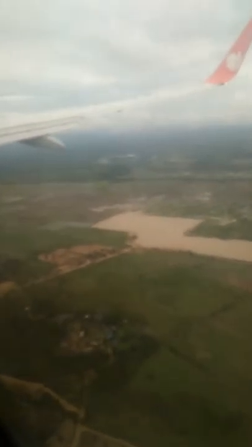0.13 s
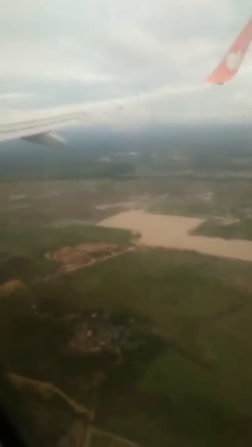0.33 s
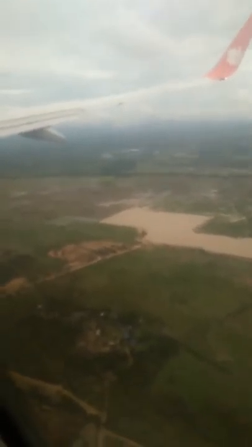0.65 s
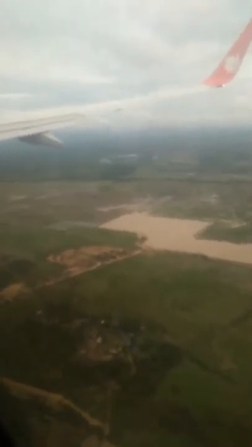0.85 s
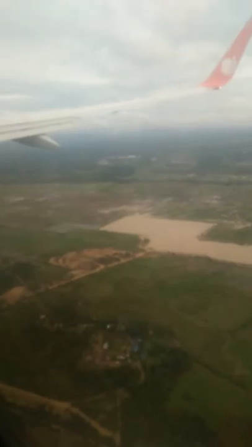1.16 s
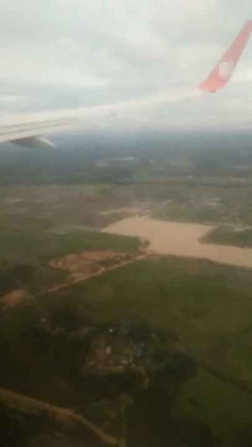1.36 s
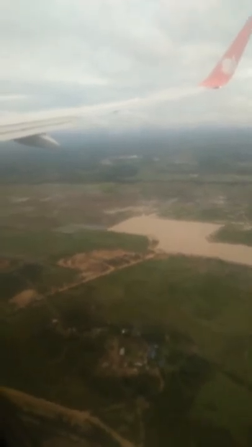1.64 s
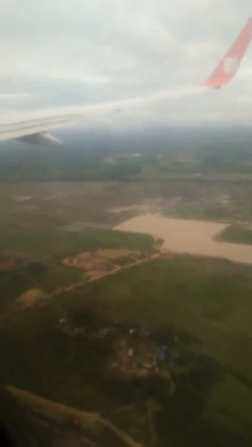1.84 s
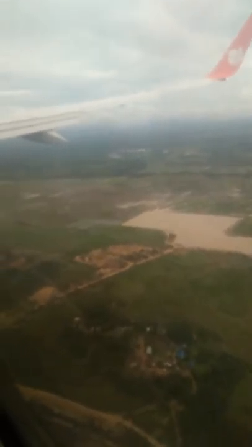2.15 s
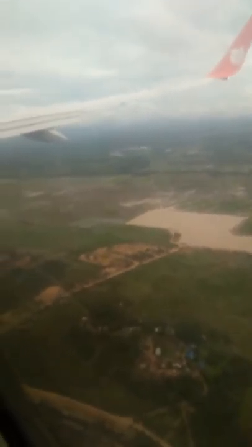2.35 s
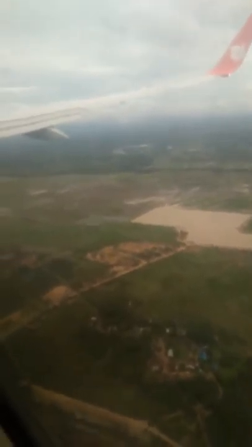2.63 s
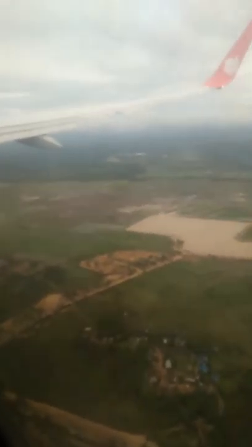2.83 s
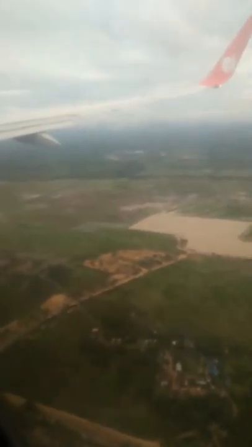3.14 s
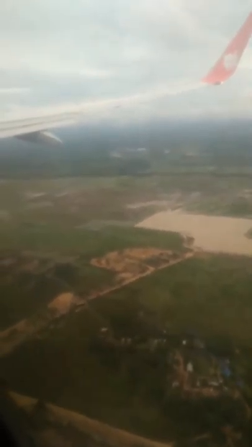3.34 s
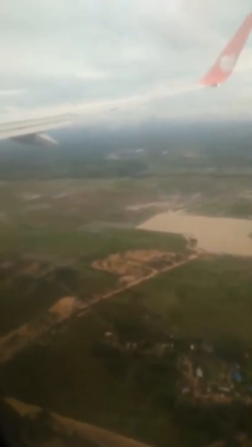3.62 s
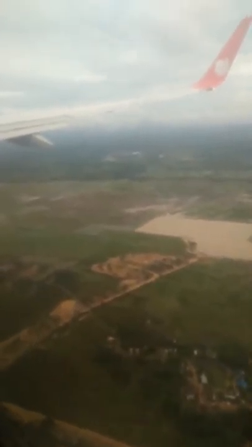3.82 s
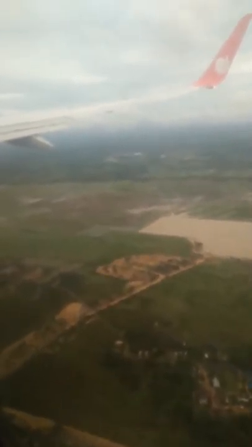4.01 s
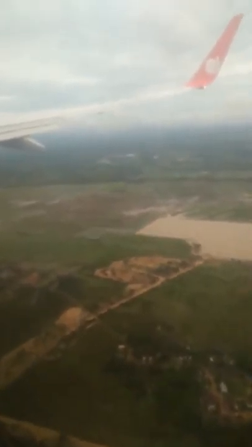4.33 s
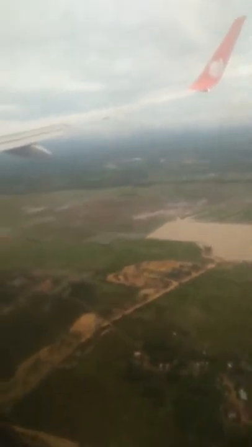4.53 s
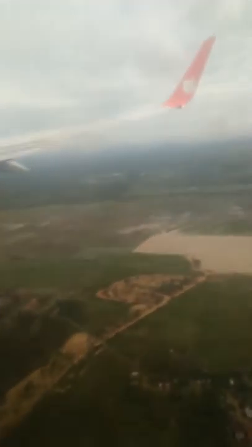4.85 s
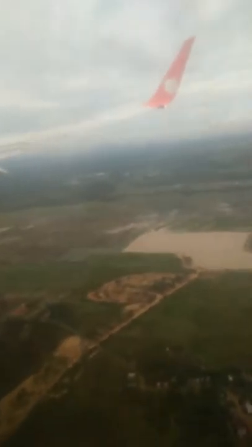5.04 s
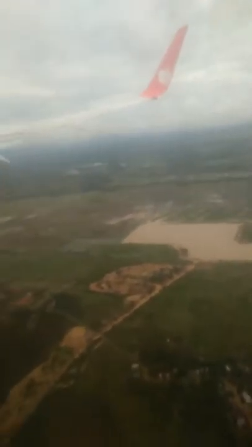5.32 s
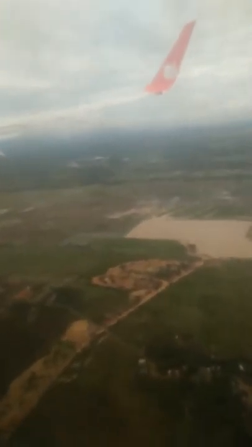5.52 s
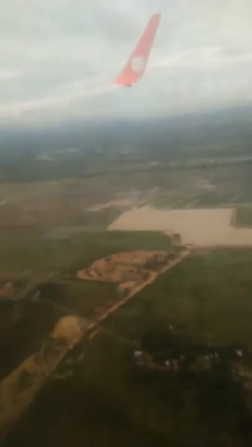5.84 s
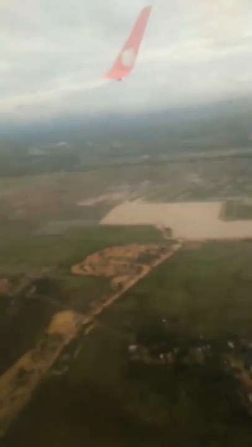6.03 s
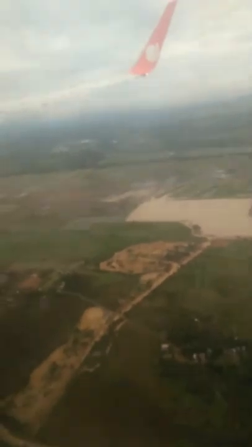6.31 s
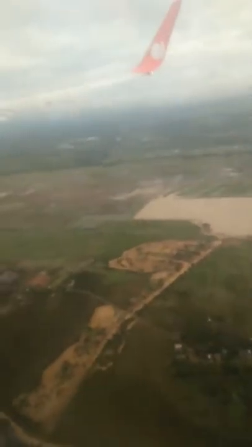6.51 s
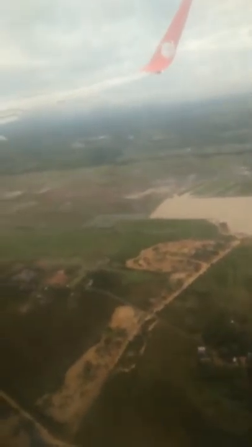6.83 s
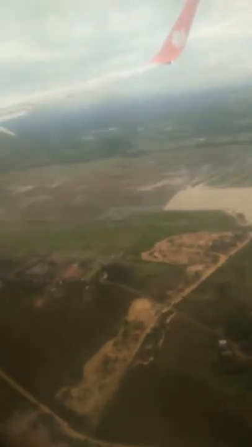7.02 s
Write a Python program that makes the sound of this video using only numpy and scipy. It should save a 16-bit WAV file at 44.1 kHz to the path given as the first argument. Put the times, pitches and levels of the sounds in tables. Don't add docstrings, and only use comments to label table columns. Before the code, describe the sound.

Continuous low cabin roar, bass-heavy and uneven, dominates from start to end, its boom swelling and dipping quickly. Quiet vent hiss and diffuse air noise sit above, with a thin constant-pitched whine that wavers in strength. A few soft, blurred thuds arrive mid-way, and light sleeve brushes and short fabric slips occur close to the phone, the last cluster near the end. Nobody speaks.

```python
import sys
import numpy as np
from scipy import signal
from scipy.fft import rfft, irfft, next_fast_len
from scipy.io import wavfile
from scipy.ndimage import uniform_filter1d, minimum_filter1d, map_coordinates

SR = 44100
rng = np.random.default_rng(int(sys.argv[2]) if len(sys.argv) > 2 else 0)


def bounce(signal):
    frames = np.transpose(np.atleast_2d(signal))
    limited = np.clip(frames, -1, 1)
    pcm = np.round(limited * 32767).astype(np.int16)
    wavfile.write(sys.argv[1], SR, pcm)


def makeup_ratio(level_db):
    decades = np.asarray(level_db, float) / 20
    return 10 ** decades


N = 316197


def unit(x):
    return x / np.sqrt(np.mean(x ** 2) + 1e-20)


def curves(rows):
    times, *columns = np.transpose(rows)
    return [np.interp(np.arange(N) / SR, times, column) for column in columns]


def wobble(rate):
    knots = rng.standard_normal(int(N * rate / SR) + 4)
    return map_coordinates(knots, [np.arange(N) * rate / SR])


def flutter(rate, db):
    return makeup_ratio(db * wobble(rate))


def swells(rows, half_s):
    times, *columns = np.transpose(rows)
    t = np.arange(0, N + 64, 64) / SR
    shape = np.exp(-0.5 * ((t[:, None] - times) / half_s) ** 2)
    return [np.interp(np.arange(N) / SR, t, shape @ db) for db in columns]


def filtered(x, response):
    m = next_fast_len(len(x) + 8192)
    return irfft(rfft(x, m) * response(np.fft.rfftfreq(m, 1 / SR)), m)[:len(x)]


def coloured(spectrum):
    hz, db = np.transpose(spectrum)
    return lambda f: makeup_ratio(np.interp(np.log(f + 1), np.log(hz + 1), db))


def ring(hz, width):
    return lambda f: (f * width / np.abs(hz * hz - f * f + 1j * f * width)) ** 2


def rush(response, patchy_db, wide_hz, long_s):
    z = signal.stft(rng.standard_normal(N), nperseg=512)[2]
    field = rng.standard_normal(z.shape)
    for _ in range(2):
        field = uniform_filter1d(field, size=1 + round(wide_hz * 512 / SR), axis=0)
        field = uniform_filter1d(field, size=1 + round(long_s * SR / 256), axis=1)
    patchy = signal.istft(z * makeup_ratio(patchy_db * unit(field)), nperseg=512)[1][:N]
    return unit(filtered(patchy, response))


def evened(x, seconds):
    size = round(seconds * SR)
    power = uniform_filter1d(uniform_filter1d(x * x, size), size)
    return unit(x / np.sqrt(np.abs(power) + 0.13))


def bursts(rows, rise, grain_db=0):
    out = np.zeros(N + SR)
    t = np.arange(SR // 4) / SR
    for s, db, response, t60 in rows:
        grain = np.interp(t, np.linspace(0, t[-1], num=60), rng.standard_normal(size=60))
        puff = unit(filtered(rng.standard_normal(len(t)), response)) * makeup_ratio(grain_db * grain)
        onset = 1 - np.exp(-t / rise)
        fade = 1 - t / t[-1]
        out[round(s * SR):][:len(t)] += makeup_ratio(db - 60 * t / t60) * fade * onset * puff
    return out[:N]


def frame():
    # (frequency [Hz], level [dB])
    boom = [(15, -41), (30, -14.5), (42, -7.5), (51, 1.5), (64, -5.5), (74, -6), (98, -9.5), (120, -11.5),
            (140, -19.5), (200, -69.5), (300, -120)]
    # (time [s], level [dB])
    surges = [(0.0, -8.5), (0.62, -11.5), (1.59, 5), (1.94, 4.5), (3.56, -9), (3.99, -6), (4.34, 5),
              (4.64, 7.5), (4.98, 3), (5.15, 2.5), (5.4, 5), (5.71, -3.5), (5.82, 6), (6.02, -7),
              (6.19, -12), (6.69, 6), (6.84, -7), (7.08, -7.5)]
    surge_db, = swells(surges, half_s=0.029)
    noise = evened(rush(coloured(boom), 0.48, 0, 0.04), 0.09)
    return makeup_ratio(surge_db - 30) * flutter(rate=9.8, db=1.38) * noise


def wall():
    # (frequency [Hz], level [dB])
    panel_modes = [(70, -59), (105, -19.5), (125, -12.5), (138, -4.5), (148, 1), (168, -2), (186, 1),
                   (207, -2), (238, -17.5), (280, -48), (450, -120)]
    # (frequency [Hz], level [dB])
    trim_modes = [(140, -37.5), (240, -7), (269, 4), (292, 4), (316, 0.5), (368, -22), (480, -45.5),
                  (810, -120)]
    # (time [s], level on the panel [dB], level on the trim [dB])
    gusts = [(0.09, -9, -9), (0.59, -12, -10.5), (0.68, 1.5, -4), (1.0, -5.0, -9), (1.21, -3, -4),
             (2.37, -2.0, -7.5), (2.57, 0, 6.5), (2.7, 5, 3), (2.81, 2.5, -4.5), (3.0, -6.5, -3.5),
             (3.26, 2.0, 5), (3.35, 4, -7), (3.46, 8.5, 4.5), (3.68, 4.5, -5.5), (4.0, 5.5, 2.0),
             (4.31, -4.5, -4), (4.54, 6.5, 3.5), (4.64, -1, -6), (5.22, -8, -3), (5.4, -9.5, 1.5),
             (5.87, 2, 6), (5.98, 3.5, 11.5), (6.26, 5.0, 6.5), (6.37, -4.5, -3.5), (6.62, 4, 6.5),
             (6.81, 3, 4.5), (7.0, -2.5, 2.0), (7.16, -8, 2)]
    # (time [s], level [dB])
    jolts = [(.265, 10), (.70, 4), (1.10, 4), (1.355, 7.5), (1.52, 6.5), (1.62, 3), (1.80, 0), (1.94, 0),
             (2.15, 3), (2.265, 7), (2.48, 7), (2.92, -1), (3.13, 7.5), (3.64, 0), (4.43, 7), (4.97, 4.5),
             (5.17, 9), (5.33, 9.5), (5.81, 2.5), (6.67, 1.5), (6.795, 2.5)]
    panel_db, trim_db = swells(gusts, half_s=0.036)
    jolt_db, = swells(jolts, half_s=0.015)
    panel_noise = evened(rush(coloured(panel_modes), 0.9, 0, 0.03), 0.065)
    trim_noise = evened(rush(coloured(trim_modes), 0.7, 0, 0.04), 0.064)
    panel = makeup_ratio(panel_db + jolt_db - 32) * flutter(rate=20, db=2.04) * panel_noise
    trim = makeup_ratio(trim_db + 0.7 * jolt_db - 40) * flutter(rate=20, db=2.04) * trim_noise
    return panel + trim


def window():
    # (frequency [Hz], level [dB])
    pane_modes = [(220, -34.5), (374, -4.5), (393, 0.5), (409, -1), (476, -0.5), (517, -11.5), (591, -2.5),
                  (655, -13), (850, -42), (1440, -120)]
    # (frequency [Hz], level [dB])
    gap_modes = [(390, -35), (660, -10.5), (725, 0.5), (895, -2), (1140, -11.5), (1250, -19), (1620, -37),
                 (2750, -120)]
    # (time [s], level on the pane [dB], level in the gap [dB])
    eddies = [(0.09, -3.5, -5), (0.33, -3.5, -5), (0.59, 2.5, 1), (1.16, 1.5, 1.5), (1.51, -2, 3.0),
              (1.76, -3.5, -3.5), (2.29, -1.5, -3.5), (2.54, -5.5, -3.5), (2.68, 1.5, -2.5),
              (2.84, -4, 2.0), (3.08, -6.5, -3), (3.36, -5, -3.5), (3.89, -4.5, 3.5), (4.19, -6.5, 3),
              (5.01, -4.5, 1.5), (5.14, 4.0, 1.5), (5.63, 4.5, -1), (6.06, 5, 1.0), (6.19, 2.5, -4),
              (6.72, 3, 2.5)]
    pane_db, gap_db = swells(eddies, half_s=0.052)
    pane_noise = evened(rush(coloured(pane_modes), 2.0, 0, 0.04), 0.091)
    gap_noise = evened(rush(coloured(gap_modes), 3.6, 0, 0.05), 0.12)
    pane = makeup_ratio(pane_db - 46) * flutter(rate=25, db=1.68) * pane_noise
    gap = makeup_ratio(gap_db - 46.5) * flutter(rate=25, db=1.68) * gap_noise
    return pane + gap


def vent():
    # (frequency [Hz], level [dB])
    hiss = [(3200, -50), (5400, -18), (6300, -7), (7050, -4), (7350, 1.5), (7900, 0), (8600, -4),
            (9300, -10.5), (10300, -16), (11100, -20.5), (12500, -30.5), (14200, -33)]
    # (time [s], level [dB])
    flow = [(0, -70), (.3, -69.5), (2, -68.5), (2.9, -66), (3.1, -70.5), (4.35, -68.5), (4.55, -67),
            (5.38, -64), (5.5, -69), (6.1, -69.5), (6.8, -68), (7.05, -69), (7.17, -64.5)]
    # (time [s], level [dB])
    puffs = [(.11, -7), (.24, 3.5), (.58, 3.5), (.7, -1.5), (.96, 4.5), (1.17, -4), (1.32, 6), (1.56, 3.5),
             (1.89, -2), (2.28, -3.5), (2.38, -0.5), (3.24, 4), (3.48, -2), (3.55, 2), (4.3, 1.5),
             (4.44, -2.5), (5.05, 1.5), (5.8, 2.5), (6.25, -5), (6.52, 4.5), (6.71, 0.5)]
    vent_db = curves(flow)[0] + swells(puffs, half_s=0.035)[0]
    return makeup_ratio(vent_db) * flutter(rate=42, db=1.3) * rush(coloured(hiss), 2.2, 300, 0.016)


def cabin():
    # (frequency [Hz], level [dB])
    low_air = [(740, -31.5), (1250, -2.5), (1540, -3), (1720, -3.5), (1930, -5), (2510, -37.5),
               (4250, -120)]
    # (frequency [Hz], level [dB])
    high_air = [(1440, -29), (2440, 0.5), (2500, -4), (2540, -4.5), (2690, -3), (3110, -8.5), (3750, -10),
                (4120, -16.5), (5600, -14), (7280, -41), (12300, -120)]
    # (frequency [Hz], width [Hz], level [dB])
    cavity = [(2064, 140, 2.5), (2210, 88, 2.5), (2303, 250, -5.5)]
    # (time [s], cupping of the window gap [dB], facing the cabin [dB])
    hand_turn = [(0, -7, -0.5), (.5, 1, -2.5), (.95, -4, -1.5), (1.2, 1, -3), (2.5, -2.5, 0),
                 (2.95, 1, 0.5), (3.2, -1, 0.5), (3.55, 3.5, 0.5), (3.9, -1.5, 0.5), (4.75, 2.5, 0),
                 (5.1, -4, -1.5), (5.75, -2.5, 0), (6.15, 4.5, -0.5), (6.5, 2, 3), (6.75, 2.5, 1),
                 (7.17, 2.5, 1.5)]
    cup_db, face_db = curves(hand_turn)
    cupped = lambda f: sum(makeup_ratio(db) * ring(hz, width)(f) for hz, width, db in cavity)
    low = makeup_ratio(-60.5 + 1.1 * wobble(4.2)) * rush(coloured(low_air), 2.2, 80, 0.035)
    high = makeup_ratio(-66 + face_db) * rush(coloured(high_air), 2.1, 90, 0.035)
    middle = makeup_ratio(-61.5 + cup_db + 0.92 * wobble(14)) * rush(cupped, 2.6, 90, 0.025)
    return low + high + middle


def pump():
    pump_hz = 1208.3
    # (order, level against the second [dB])
    orders = [(1, 3), (2, 0), (3, -14), (4, -23)]
    # (time [s], level [dB])
    whine = [(0, -70.5), (1.4, -70.5), (2.4, -78.5), (3.1, -68.5), (3.6, -72), (4.3, -68.5), (4.9, -72),
             (5.4, -73), (5.75, -73), (6.15, -75.5), (6.4, -75), (7.17, -74)]
    phase = 2 * np.pi * pump_hz * np.arange(N) / SR + 0.22 * wobble(10)
    swell_db, = curves(whine)
    out = np.zeros(N)
    for order, db in orders:
        base_db = swell_db if order == 2 else swell_db.mean()
        level_db = db + base_db + 2.9 * wobble(11) + 0.37 * wobble(30)
        out += np.sqrt(2) * makeup_ratio(level_db) * np.sin(order * phase)
    return out


def knocks():
    # (time [s], level [dB], centre [Hz], width [Hz], t60 [s])
    hits = [(0.289, -56, 1770, 250, 0.22), (1.12, -55, 2200, 201, 0.28), (1.228, -55.5, 1890, 250, 0.31),
            (1.33, -58, 1930, 250, 0.26), (1.818, -46, 1150, 348, 0.48), (2.462, -55.5, 1720, 200, 0.5),
            (3.13, -52.5, 1650, 200, 0.26), (3.13, -56, 2650, 400, .3), (3.868, -43, 1090, 250, .3),
            (4.58, -52.5, 1460, 250, .25), (4.969, -55, 1350, 500, 0.67), (5.14, -46.5, 1350, 480, 0.65),
            (5.38, -53.5, 1740, 150, 0.27), (6.47, -49.5, 2070, 200, 0.4), (7.06, -64, 1300, 400, 0.23),
            (7.05, -52, 2080, 200, 0.3)]
    return bursts([(s, db, ring(hz, width), t60) for s, db, hz, width, t60 in hits], rise=0.0019)


def brushes():
    # (time [s], level [dB], centre [Hz], width [Hz], t60 [s])
    strokes = [
        (1.26, -65, 6000, 600, .7),
        (.58, -86, 12000, 3000, .4),
        (4.05, -88, 12000, 3000, .5),
        (2.752, -76.5, 13700, 1210, .25),
        (4.85, -89, 11000, 2500, 1.5),
        (5.17, -89, 12000, 2500, 1.5),
        (5.3, -77, 4900, 1500, 0.22),
    ]
    rows = [(s, db, ring(hz, width), t60) for s, db, hz, width, t60 in strokes]
    return bursts(rows, rise=0.011, grain_db=0.5)


def rustles():
    # (time [s], level [dB], lower edge [Hz], t60 [s])
    cloth = [
        (1.267, -82, 5500, .3),
        (1.507, -67.5, 5500, .14),
        (2.401, -74.5, 5500, .16),
        (2.756, -70.5, 5500, .16),
        (4.486, -68, 4200, .12),
        (6.492, -77, 5470, 0.17),
        (6.945, -74, 5500, 0.2),
        (6.978, -74, 5500, .2),
        (7.04, -66, 5500, 0.2),
    ]
    knots_hz = np.arange(0, SR / 2, 1200)

    def bright(edge, tint_db):
        def response(f):
            port = 1 + 3.5 / (1 + ((f - 7800) / 1100) ** 2)
            tint = makeup_ratio(np.interp(f, knots_hz, tint_db))
            low_edge = 1 + (edge / (f + 1)) ** 6
            high_edge = 1 + (f / 13000) ** 4
            return port * tint / low_edge / high_edge * (f < 14500)
        return response

    slips = []
    for s, db, edge, t60 in cloth:
        tint_db = 2.5 * rng.standard_normal(len(knots_hz))
        slips.append((s, db + 8.5, bright(edge, tint_db), t60))
    tails = [(s, db - 12, colour, 1.1) for s, db, colour, _ in slips]
    return bursts(slips + tails, rise=0.002, grain_db=4.0)


def scene():
    # (frequency [Hz], width [Hz], lift [dB])
    standing = [(376.5, 12.6, -13), (231, 19, -1), (412, 61, 2.5), (452, 22, -4), (786, 19, -2),
                (921, 8.7, 5), (1130, 26, -1), (1346, 55, 2), (1514, 32, 3), (1540, 46, -3.5),
                (1740, 54, 2.5), (2290, 60, -6.5), (2520, 74, -2.5), (2700, 50, -0.5), (2690, 82, 3.5),
                (3230, 55, 0.5), (3464, 90, 4.5), (3560, 54, -7.5), (3570, 60, -1), (4300, 60, 2.5)]
    air = frame() + wall() + window() + vent() + cabin() + knocks() + brushes() + rustles()
    lift_db = lambda f: sum(db / (1 + (2 * (f - hz) / width) ** 2) for hz, width, db in standing)
    return (filtered(air, lambda f: makeup_ratio(lift_db(f))) + pump())[None]


def limited(x):
    ceiling, hold_s = 0.185, 0.012
    size = round(hold_s * SR)
    gain = minimum_filter1d(np.minimum(1, ceiling / (np.abs(x) + 1e-9)), size=2 * size)
    return x * uniform_filter1d(uniform_filter1d(gain, size), size)


def roll_off(x):
    return signal.sosfilt(signal.butter(12, 14180, fs=SR, output="sos"), x)


def record(dry):
    # (frequency [Hz], level [dB])
    self_noise = [(6000, -43), (9500, -4.5), (11000, 0), (14200, -2)]
    cut = filtered(dry[0], lambda f: 1 / (1 + (37 / (f + 1)) ** 5))
    hiss = makeup_ratio(-88.0) * unit(filtered(rng.standard_normal(N), coloured(self_noise)))
    mix = limited(cut + hiss)[None]
    return roll_off(mix)


dry = scene()
out = record(dry)
bounce(out)
```